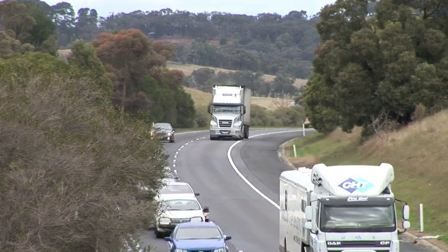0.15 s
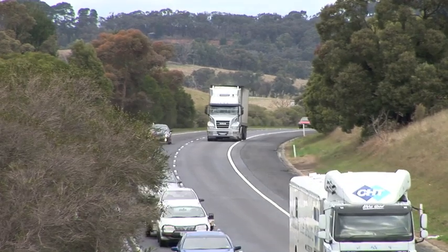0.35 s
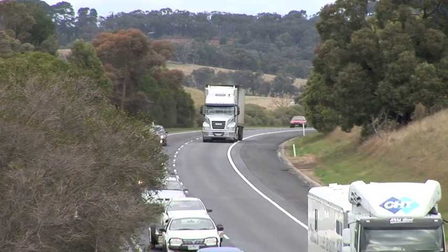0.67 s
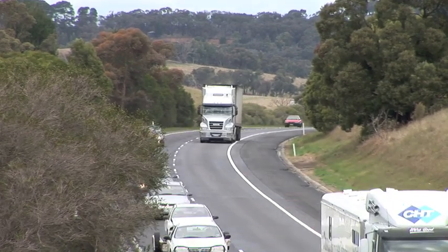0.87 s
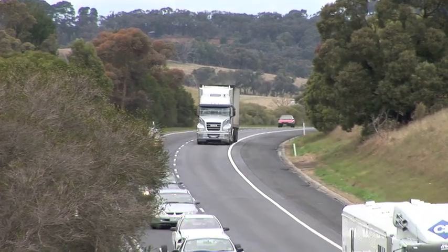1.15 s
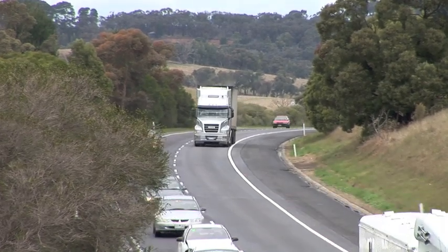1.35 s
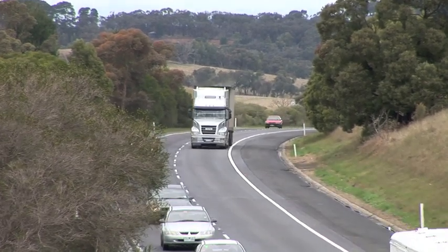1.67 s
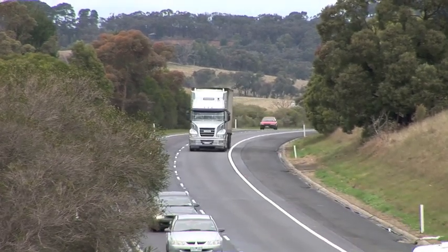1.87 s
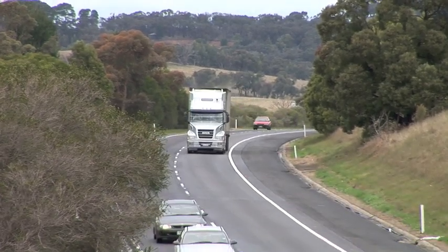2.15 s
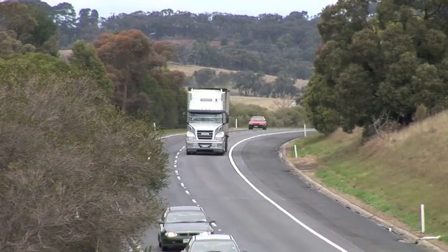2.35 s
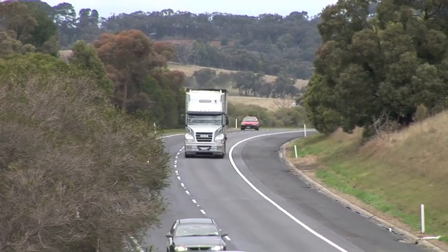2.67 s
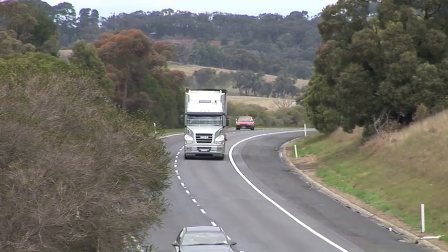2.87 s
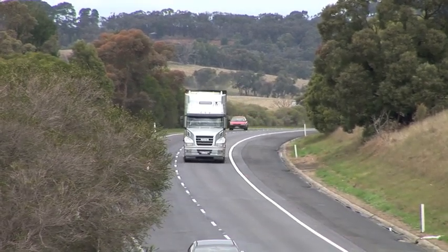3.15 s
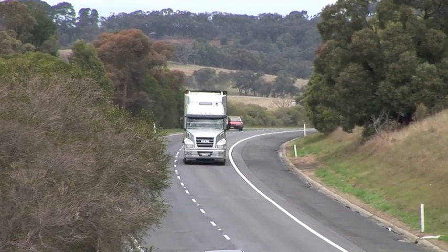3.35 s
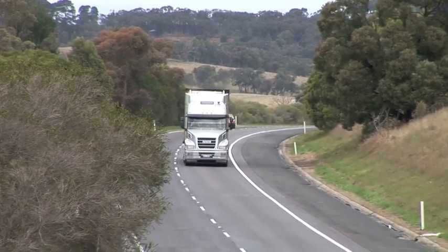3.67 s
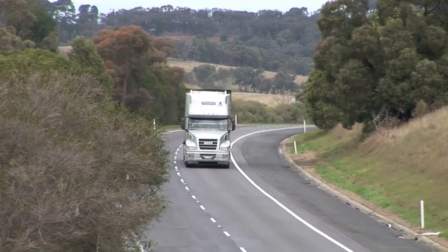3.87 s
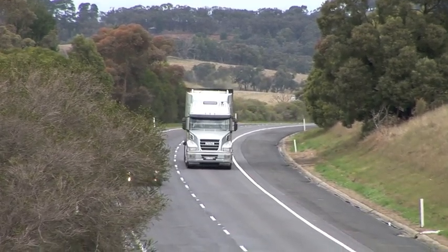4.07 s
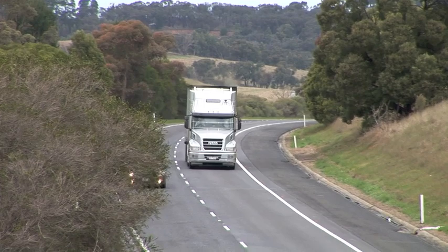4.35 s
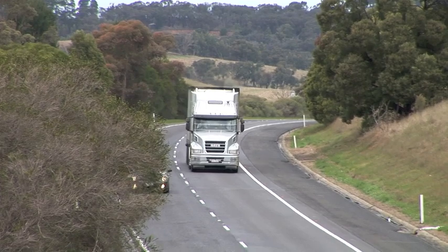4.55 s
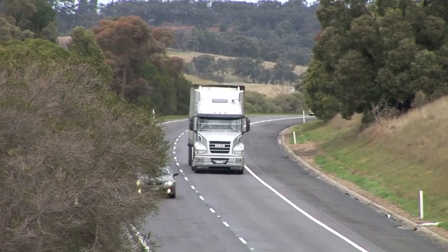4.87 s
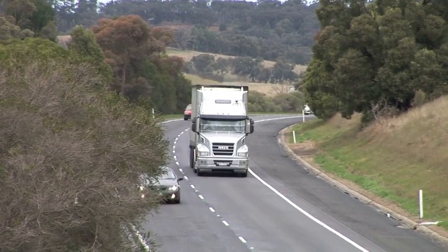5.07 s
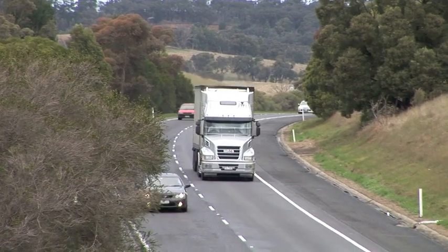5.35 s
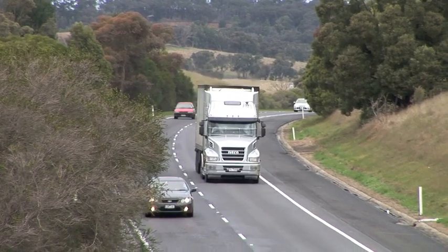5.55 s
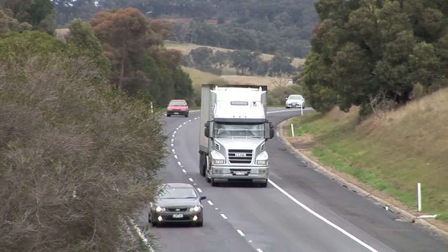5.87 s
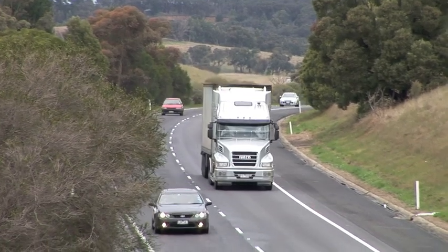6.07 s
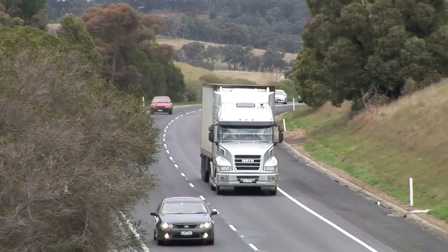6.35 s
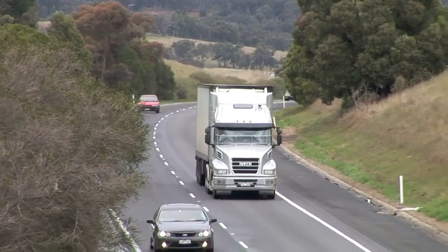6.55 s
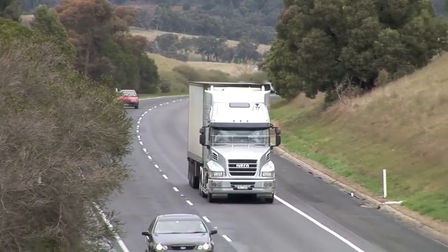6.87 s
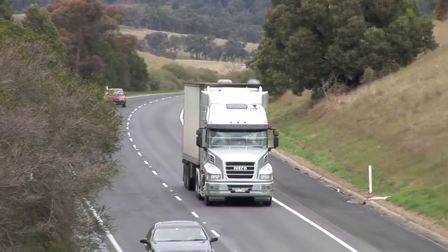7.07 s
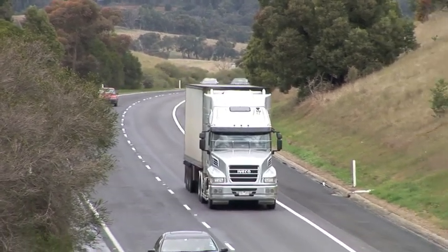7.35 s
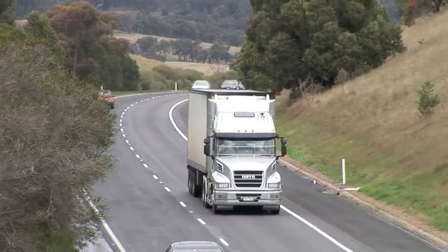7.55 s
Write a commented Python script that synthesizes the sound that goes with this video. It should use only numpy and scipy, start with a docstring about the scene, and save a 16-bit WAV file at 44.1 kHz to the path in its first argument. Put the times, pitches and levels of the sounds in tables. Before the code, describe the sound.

Tyres roar and hiss along a highway as a motorhome and cars sweep by, then a diesel truck drones past close.

```python
"""Tyre roar and hiss at a roadside: a motorhome and cars sweep by, then a diesel truck passes close.
Tyres surge and howl on coarse asphalt, treads and gears whine, air rushes round the bodies.
A loose panel rattles on the motorhome; the truck's exhaust drones and drops in pitch as it goes by.
A closely spaced stereo microphone hears the bass in the middle and the roar to the right."""
import sys
import numpy as np
from scipy import signal
from scipy.fft import rfft, irfft, next_fast_len
from scipy.io import wavfile
from scipy.ndimage import uniform_filter1d, map_coordinates

SR = 44100
rng = np.random.default_rng(int(sys.argv[2]) if len(sys.argv) > 2 else 0)


def pcm_store(signal):
    """Save signal as 16-bit PCM."""
    levels = np.round(np.clip(np.atleast_2d(signal), -1, 1) * 32767)
    wavfile.write(sys.argv[1], SR, levels.astype(np.int16).T)


N = 339481
TIME_S = np.arange(N) / SR
SPEED_M_S, SOUND_M_S = 27, 343
LANE_M = 11  # passing distance of whines, howl and surges

# Noise spectra. Each row: frequency in Hz, relative density in dB.
FAR_TRAFFIC_SPECTRUM = [(35, -32.5), (70, 6.5), (120, 3), (170, 1), (240, -3.5), (400, -18.5)]
TREBLE_HISS_SPECTRUM = [(3000, -20), (6300, -4), (7500, -6), (9000, -1), (11000, .5), (14000, 0),
                        (15500, -4)]
TYRE_ROAR_SPECTRUM = [(300, -23.5), (600, -16.5), (800, 0), (950, 0), (1120, 1.5), (1300, -2.5),
                      (1500, -16.5), (2000, -12), (3000, -41)]
TREAD_HISS_SPECTRUM = [(700, -26), (1200, -2.5), (1600, 0), (2300, -1.5), (2800, -5), (3400, -13.5),
                       (4200, -35.5)]
SIZZLE_SPECTRUM = [(2400, -9), (3300, 4.5), (3950, 5.5), (4500, -6.5), (4950, -1), (5400, -10), (5900, -12),
                   (6700, -36.5), (8000, -64)]
BODY_RUSH_SPECTRUM = [(50, -12.5), (90, 1), (150, 2), (220, 1.5), (330, 1), (460, -3.5), (640, -2),
                      (850, -4), (1400, -25)]
WAKE_RUMBLE_SPECTRUM = [(15, -11.5), (30, -5), (48, 1), (70, 8), (95, 1.5), (140, 1), (220, -25.5)]
HOWL_SPECTRUM = [(700, -21.5), (860, -2), (985, 12.5), (1050, 8), (1180, 11.5), (1300, -11), (1670, -24)]
# Swells of faint treble hiss. Each row: peak time in seconds, level in dB, rise and fall in seconds.
TREBLE_SWELLS = [(1.34, -67, .27, .33), (1.74, -70.5, .2, .2), (1.6, -77, 1.2, 1.3), (4.4, -75, .7, .4),
                 (4.8, -65.3, .27, .35), (5.36, -65.7, .3, .42), (5.85, -73, .3, .25), (6.6, -77, .9, .9),
                 (6.85, -73, .18, .2), (7.48, -75, .2, .22)]
# Vehicles; motorhome third, truck and trailer seventh and eighth. Each row: time abreast in seconds,
# reach in metres (distance, more if long), roar, hiss, sizzle, rush and rumble in dB, rightward share.
VEHICLES = [(.29, 24, -47, -48, -60.5, -57, -71, 0.067), (1.219, 19, -44.5, -41.5, -58.5, -55, -57.5, .4),
            (1.58, 10.3, -45, -42.5, -70.5, -44.5, -43, .93),
            (3.38, 14, -47.5, -46.5, -58, -57.5, -66.5, 0.025),
            (4.021, 4.9, -46.5, -45.5, -55.5, -44.5, -69.5, .074),
            (4.38, 6.2, -36, -44.5, -52.5, -43.5, -71, .2), (4.79, 7.7, -42, -37, -56.5, -36.5, -47, .52),
            (5.32, 17.1, -38, -37, -52.5, -35, -40.5, .5), (5.719, 8.1, -41, -40.5, -60, -48, -57, 0.057),
            (6.719, 14.2, -37, -38.5, -55, -42, -56, .45),
            (7.419, 6.1, -42, -41.5, -60.5, -41.5, -46.5, .42),
            (7.8, 12, -43.5, -69.5, -71, -57, -46, 0.55)]
# Tones of wheels and machinery, by name. Each row: source pitch in Hz, time abreast and peak time in
# seconds, level in dB, rise and fall in seconds, pitch jitter as a share, jitter rate in Hz, waver in dB.
WHINES = {"motorhome tyre whine": (745, 1.9, .55, -51.5, 1.4, 1.1, .032, 110, 3),
          "motorhome tyre whine, close": (805, 1.9, 1.3, -49.5, .6, .6, .04, 110, 3),
          "truck tread": (513, 5.35, 3.9, -52, 1.05, 1.2, .006, 40, 1.8),
          "truck tread octave": (1030, 5.35, 3.6, -47, 1.7, 1.6, .006, 110, 2.5),
          "gear whine, coming": (352, 5.25, 4.1, -55, 1.1, .8, .007, 30, 2.5),
          "trailer tread": (975, 5.35, 4.3, -47, .9, .7, .012, 110, 2.5),
          "motorhome tread ring": (1155, 1.9, .95, -50, .9, .5, .011, 110, 3),
          "gear whine, going": (354, 5.25, 5.75, -45, .2, .17, .014, 60, 3),
          "deep engine, far off": (74.5, 5.1, 3.1, -53.5, 1.0, 1.1, .018, 24, 1),
          "deep engine, close": (74.5, 5.1, 4.82, -38.5, .72, .62, .024, 24, 1),
          "drive line, front": (216, 5.75, 5.22, -38.5, .22, .25, .014, 60, 2.5),
          "drive line, rear": (213, 5.75, 6.12, -45.5, .18, .16, .025, 60, 3),
          "trailer wheel drone": (232, 5.75, 6.41, -45, .09, .1, .025, 60, 2)}
# Noise bands from single tyre sets and bodies, by name. Each row: peak time in seconds, level in dB,
# rise and fall in seconds, centre in Hz, half-width in octaves.
SURGE_BANDS = {"motorhome tread howl": (1.27, -48, .25, .15, 1320, .12),
               "motorhome tyres, coming": (1.47, -46, .45, .27, 2450, .65),
               "motorhome body whoosh": (1.51, -42, .16, .19, 600, .75),
               "motorhome tyres, going": (1.82, -46, .22, .28, 1400, .4),
               "first car tyres": (2.52, -51.5, .12, .17, 2500, .4),
               "first car sizzle": (3.2, -64.5, .1, .12, 5300, .4),
               "first car tread howl": (3.45, -51.5, .45, .5, 1200, .17),
               "second car sizzle": (3.9, -54.5, .22, .2, 3200, .5),
               "truck tread roar, coming": (3.9, -53, .9, .8, 760, .12),
               "truck tread howl": (4.63, -38, .1, .12, 1060, .2),
               "truck front tyres": (4.66, -39.8, .22, .27, 2400, .55),
               "truck sizzle": (4.56, -61, .16, .18, 4900, .3),
               "trailer body whoosh": (5.12, -44, .15, .15, 590, .35),
               "trailer sizzle": (5.4, -64, .4, .4, 4900, .25),
               "trailer tyres, going": (5.98, -43.5, .22, .2, 1900, .55),
               "third car tyres": (6.45, -42, .25, .2, 2200, .45),
               "third car sizzle": (6.65, -53.5, .1, .12, 3800, .45),
               "third car body whoosh": (6.75, -46, .12, .2, 500, .6),
               "third car wake": (6.85, -49, .3, .4, 190, .6),
               "last car sizzle": (7.05, -63, .55, .35, 4900, .3),
               "last car tyres": (7.19, -41.5, .24, .16, 2350, .45)}
# Blows on the loose panel. Each row: start in seconds, level before filtering in dB, ring pitch in Hz.
PANEL_KNOCKS = [(1.387, -28, 1250), (1.447, -36, 720), (1.478, -29.5, 760), (1.489, -32, 850),
                (1.502, -31.5, 650), (1.529, -33, 720), (1.541, -34, 950), (1.562, -28.5, 680),
                (1.57, -27, 780), (1.58, -26, 600), (1.594, -35, 800), (1.622, -35, 680),
                (1.657, -24.5, 1250)]
# The panel's hollow ring. Each row: multiple of its pitch, relative density in dB.
PANEL_RING = [(.3, -14), (.65, -6), (.89, -1), (1, 4), (1.13, -4), (1.5, -9), (2, -10), (3.5, -22)]
# Exhaust envelope. Each row: time in seconds, level before dips in dB.
EXHAUST_LEVELS = [(0, -53), (1.9, -50), (2.2, -45), (2.8, -45.5), (3.3, -41.5), (4, -37.5), (4.6, -33.5),
                  (5.18, -29.5), (5.3, -23.5), (5.5, -26.5), (5.68, -25.5), (5.87, -28.5), (6.05, -26),
                  (6.14, -27), (6.24, -33), (6.31, -34), (6.39, -42), (6.5, -41), (6.8, -44.5),
                  (7.24, -38.5), (7.45, -45), (7.7, -50)]
# Exhaust overtones. Each row: multiple of the firing rate, level relative to the firing tone in dB.
EXHAUST_OVERTONES = [(1.5, -25), (2, -26), (2.5, -26), (3, -25), (4, -28), (5, -27)]
# Brief dips in the drone as the truck draws away. Each entry: centre in seconds.
DIP_TIMES_S = [5.83, 6.08, 6.22, 6.4, 6.55, 6.64, 6.81, 6.92, 7.13, 7.43, 7.61]
# The microphone's narrow treble ring. Each row: frequency in Hz, gain in dB.
MIC_RESONANCE = [(100, 0), (4000, 0), (4550, -4), (4950, 5), (5400, -2.5), (6000, -4.5), (7000, -14)]
# The microphone's response to sideways sound. Each row: frequency in Hz, gain in dB, lag in radians.
MIC_SIDE_RESPONSE = [(60, -55.5, .3), (141, -42, .6), (254, -16.5, 1), (450, -7, 1), (750, -3, 2.2),
                     (1150, -5.5, 2.65), (1510, -3, 2.8), (2080, -11, 3.1), (3000, -23.5, 1.9),
                     (4400, 0.5, 1.05), (4960, -5.5, 1.7), (6140, 16, 1.2), (8200, 35, 1.9)]


def undb(db):
    """Decibels to gain."""
    return 10 ** (np.asarray(db) / 20)


def unit(x):
    """Scale to rms 1."""
    return x / np.sqrt(np.mean(x ** 2))


def colour(x, points):
    """Filter by rows of Hz, dB and optional lag in radians; rolls off past both ends."""
    size = next_fast_len(N)
    hz, *columns = np.transpose(points)
    bins_hz = np.maximum(np.arange(size // 2 + 1) * SR / size, 1)
    db, *lag_rad = (np.interp(np.log(bins_hz), np.log(hz), column) for column in columns)
    skirts = np.minimum(bins_hz / hz[0], 1) ** 2 * np.minimum(hz[-1] / bins_hz, 1) ** 6
    return irfft(rfft(x, size) * skirts * undb(db) * np.exp(-1j * sum(lag_rad)), size)[:N]


def noise(spectrum):
    """Coloured noise, rms 1."""
    return unit(colour(rng.standard_normal(N), spectrum))


def walk(rate_hz):
    """Smooth random drift, rms 1."""
    knots = rng.standard_normal(4096)
    drift = np.interp(TIME_S * rate_hz, np.arange(len(knots)), knots)
    return unit(uniform_filter1d(drift, int(SR / rate_hz / 2)))


def rotation_rad(hz, jitter, rate_hz):
    """Phase of an unsteady rotation."""
    return 2 * np.pi * np.cumsum(hz * (1 + jitter * walk(rate_hz))) / SR


def tone(hz, rms_db, jitter, rate_hz, waver_db):
    """Sine with wavering pitch and level."""
    sine = np.sqrt(2) * np.sin(rotation_rad(hz, jitter, rate_hz))
    return sine * undb(rms_db + waver_db * walk(rate_hz / 2))


def swell_db(peak_s, db, rise_s, fall_s):
    """Rounded swell, 10 dB down rise_s before and fall_s after its peak."""
    offset_s = TIME_S - peak_s
    return db - 10 * (offset_s / np.where(offset_s < 0, rise_s, fall_s)) ** 2


def closeness(abreast_s, reach_m):
    """Closest over present distance: 1 when abreast."""
    return reach_m / np.hypot(reach_m, SPEED_M_S * (TIME_S - abreast_s))


def doppler(hz, abreast_s, reach_m):
    """Heard pitch: high coming, low going."""
    along_m = SPEED_M_S * (TIME_S - abreast_s)
    return hz / (1 + SPEED_M_S / SOUND_M_S * along_m / np.hypot(along_m, reach_m))


def going_by(x, abreast_s):
    """Doppler-shift a sound by resampling."""
    position = np.cumsum(doppler(0.99, abreast_s, LANE_M))
    return map_coordinates(x, [position], order=3, mode="mirror")


def passing_gain(part, lead_s, falloff, floor_db):
    """Power sum over vehicles; each peaks lead_s before abreast and falls as distance ** -falloff."""
    column = ["roar", "hiss", "sizzle", "rush", "rumble"].index(part)
    power = sum((undb(levels_db[column]) * closeness(abreast_s - lead_s, reach_m) ** falloff) ** 2
                for abreast_s, reach_m, *levels_db, _ in VEHICLES)
    return np.sqrt(power + undb(floor_db) ** 2)


def rightward(lag_s, focus=2.33):
    """Pull to the right, peaking lag_s after each vehicle is abreast."""
    return sum(share * closeness(abreast_s + lag_s, reach_m) ** focus
               for abreast_s, reach_m, *_, share in VEHICLES)


def flutter(depth_db=.4):
    """Gain flutter that moving air gives tyre noise."""
    return undb(depth_db * walk(36))


def far_traffic(db=-48):
    """Low murmur of distant vehicles."""
    return noise(FAR_TRAFFIC_SPECTRUM) * undb(db + walk(11))


def treble_hiss(floor_db=-78.5):
    """Faint, wide treble hiss that swells as vehicles pass."""
    power = undb(floor_db) ** 2 + sum(undb(swell_db(*swell)) ** 2 for swell in TREBLE_SWELLS)
    stereo = np.array([noise(TREBLE_HISS_SPECTRUM), noise(TREBLE_HISS_SPECTRUM)])
    return stereo * np.sqrt(power) * undb(0.66 * walk(30))


def road_noise():
    """Over far traffic, tyres roar, treads pump hiss ahead, air rushes round bodies and wakes rumble."""
    sizzle = noise(SIZZLE_SPECTRUM) * passing_gain("sizzle", lead_s=.098, falloff=1.37, floor_db=-70)
    sizzle *= flutter()
    hiss = noise(TREAD_HISS_SPECTRUM) * passing_gain("hiss", lead_s=.27, falloff=1.15, floor_db=-52)
    tread = (hiss + sizzle) * flutter()
    roar = noise(TYRE_ROAR_SPECTRUM) * passing_gain("roar", lead_s=0, falloff=1.25, floor_db=-58.5)
    roar *= flutter()
    rush = noise(BODY_RUSH_SPECTRUM) * passing_gain("rush", lead_s=0, falloff=1.72, floor_db=-52)
    wake = noise(WAKE_RUMBLE_SPECTRUM) * passing_gain("rumble", lead_s=-.061, falloff=1.54, floor_db=-62)
    return tread + roar + rush + wake + far_traffic()


def tyre_howl():
    """The wedge between truck tyre and road beams a howl forwards; it sinks in passing."""
    howl = going_by(noise(HOWL_SPECTRUM), abreast_s=4.95)
    return howl * undb(swell_db(peak_s=4.55, db=-38, rise_s=1.65, fall_s=.7))


def whines():
    """Tread blocks, gears, shafts and engine sing at nearly even rates, sinking as they pass."""
    out = 0
    for hz, abreast_s, peak_s, db, rise_s, fall_s, *wavering in WHINES.values():
        out += tone(doppler(hz, abreast_s, LANE_M), swell_db(peak_s, db, rise_s, fall_s), *wavering)
    return out


def surges():
    """Tyres beam hiss in narrow lobes and bodies push air aside, so each swells briefly."""
    out = 0
    for peak_s, db, rise_s, fall_s, hz, octaves in SURGE_BANDS.values():
        ratio = 2 ** octaves
        band = noise([(hz / ratio, -12), (hz, 0), (hz * ratio, -12), (hz * ratio ** 2, -36)])
        out += going_by(band, peak_s) * undb(swell_db(peak_s, db, rise_s, fall_s))
    return colour(out, MIC_RESONANCE)


def panel_rattle(decay_s=0.0041):
    """Short, dull blows on a hollow panel, each ringing at its own pitch."""
    out = 0
    for start_s, db, hz in PANEL_KNOCKS:
        fade = (TIME_S >= start_s) * np.exp(-np.abs(TIME_S - start_s) / decay_s)
        ring = noise([(hz * multiple, ring_db) for multiple, ring_db in PANEL_RING])
        out += undb(db) * unit(fade * ring) * np.sqrt(np.mean(fade ** 2))
    return colour(out, [(100, 4.0), (1500, -3.5), (3000, -5)])


def truck_exhaust(firing_hz=104, growl_rad=.9, dip_db=-14, dip_half_width_s=.031):
    """Muffled diesel: a clean firing tone, with overtones blurred into a growl by unsteady timing."""
    heard_hz = doppler(firing_hz, abreast_s=5.83, reach_m=9.5)
    dips_db = dip_db * sum(np.exp(-((TIME_S - at_s) / dip_half_width_s) ** 2) for at_s in DIP_TIMES_S)
    level_db = np.interp(TIME_S, *np.transpose(EXHAUST_LEVELS)) + dips_db
    phase_rad = rotation_rad(heard_hz, jitter=0.00269, rate_hz=15)
    overtones = sum(undb(db + 3.4 * walk(7.6)) * np.sin(multiple * phase_rad + growl_rad * walk(45))
                    for multiple, db in EXHAUST_OVERTONES)
    drone = np.sqrt(2) * (np.sin(phase_rad) + overtones) * undb(level_db + .6 * walk(22))
    # After the pass, the bank returns the tone at mixed pitches: a rumble.
    echo_db = swell_db(peak_s=6.45, db=-43.5, rise_s=.5, fall_s=.8) + dips_db / 2
    return drone + tone(heard_hz * 1.12, echo_db, jitter=0.0717, rate_hz=40, waver_db=3)


def scene(far_lean=-0.19, scatter_db=-10, bank_db=-2.5, bank_lag_s=0.29):
    """Direct sound swings right with each vehicle; scatter from bank and trees widens it just after."""
    mid = road_noise() + truck_exhaust() + tyre_howl() + whines() + surges() + panel_rattle()
    scatter_gain = undb(scatter_db) + undb(bank_db) * rightward(bank_lag_s)
    scattered = (road_noise() + tyre_howl() + whines() + surges()) * scatter_gain
    side = colour(mid * (far_lean + rightward(0)) + scattered, MIC_SIDE_RESPONSE)
    return np.array([mid + side, mid - side]) + treble_hiss()


def record(dry):
    """Steep low-pass at 15 kHz."""
    return signal.sosfilt(signal.ellip(10, .1, 80, 15000, fs=SR, output="sos"), dry)


dry = scene()
out = record(dry)
pcm_store(out)
```